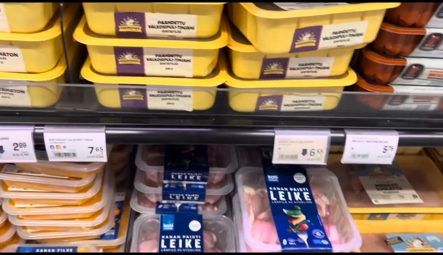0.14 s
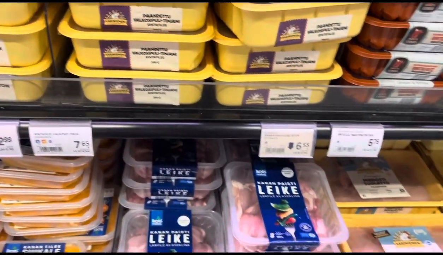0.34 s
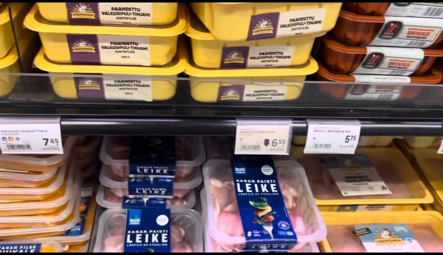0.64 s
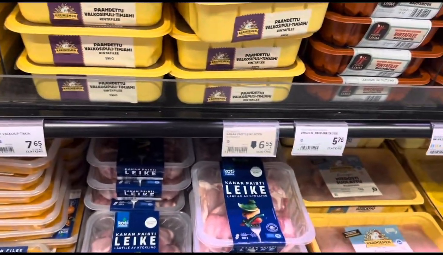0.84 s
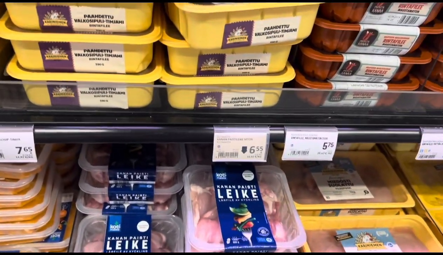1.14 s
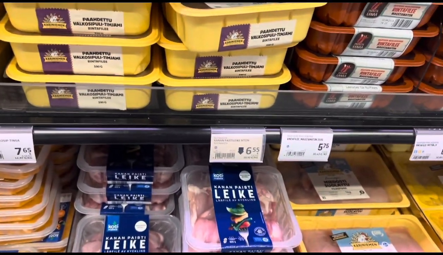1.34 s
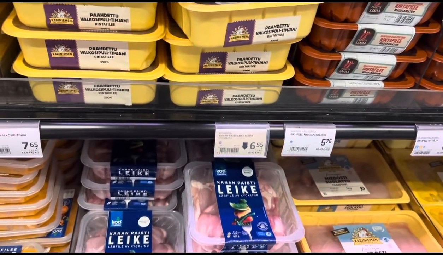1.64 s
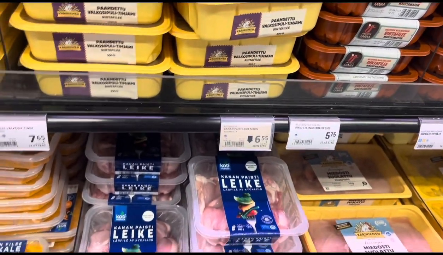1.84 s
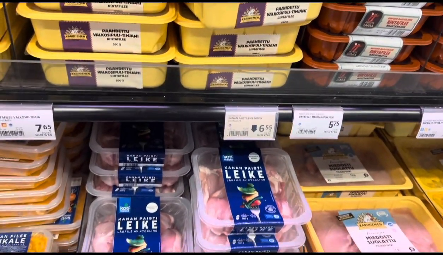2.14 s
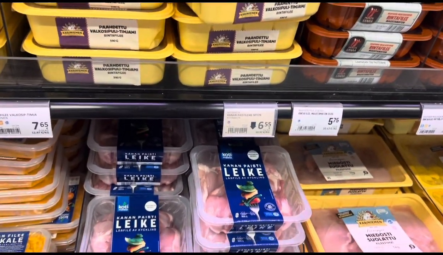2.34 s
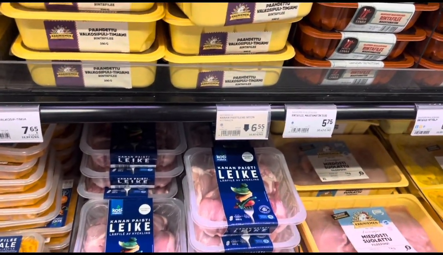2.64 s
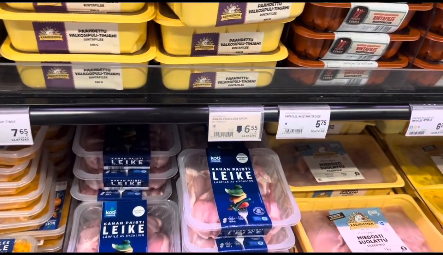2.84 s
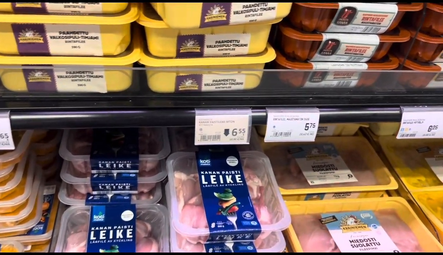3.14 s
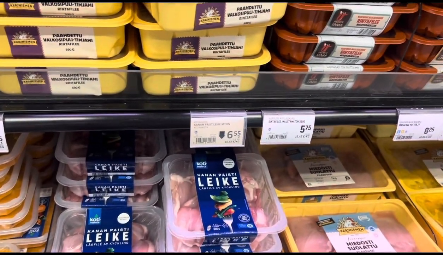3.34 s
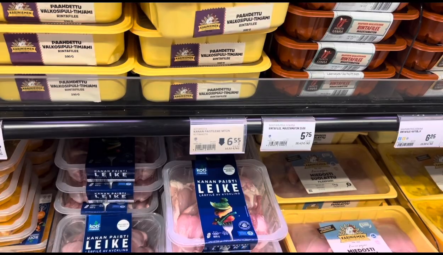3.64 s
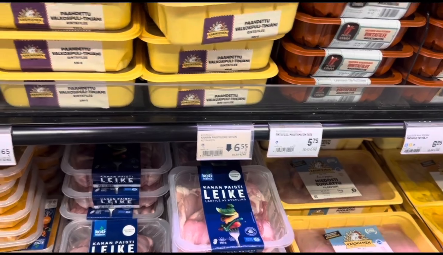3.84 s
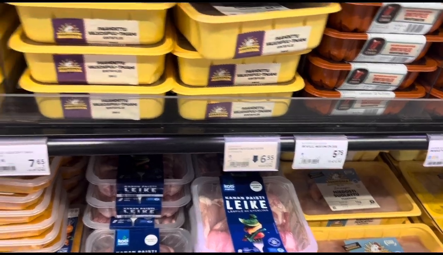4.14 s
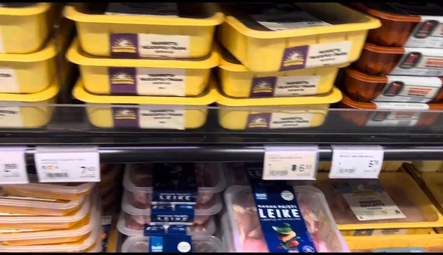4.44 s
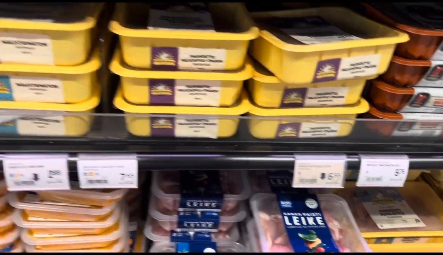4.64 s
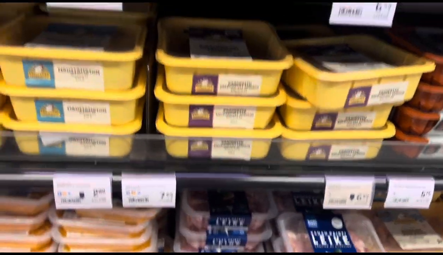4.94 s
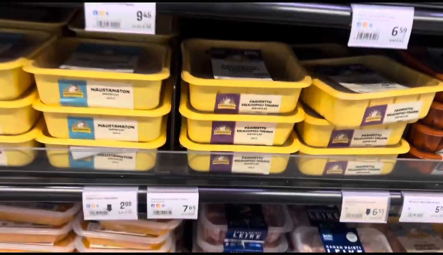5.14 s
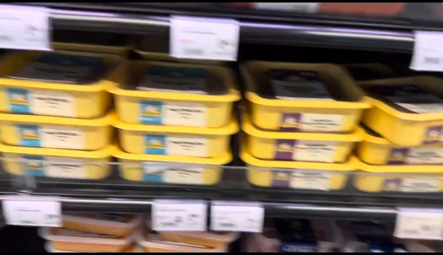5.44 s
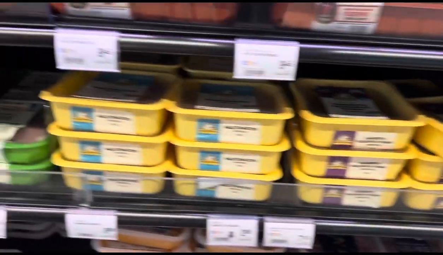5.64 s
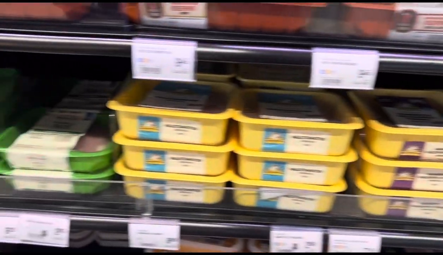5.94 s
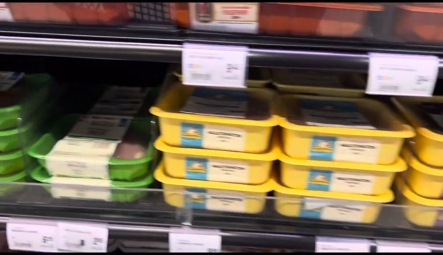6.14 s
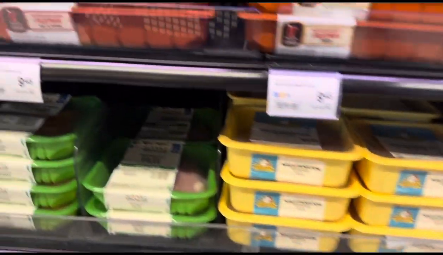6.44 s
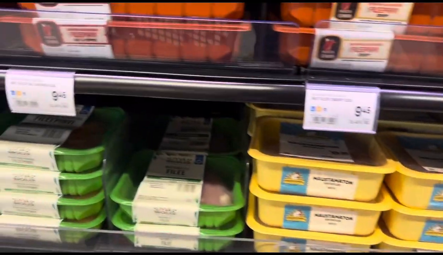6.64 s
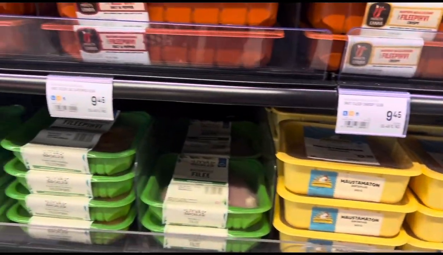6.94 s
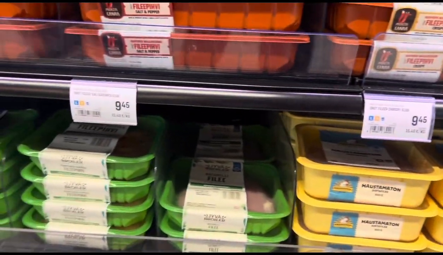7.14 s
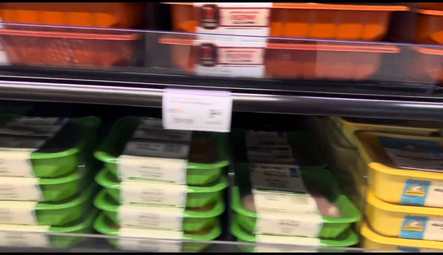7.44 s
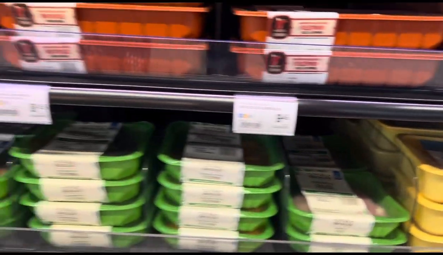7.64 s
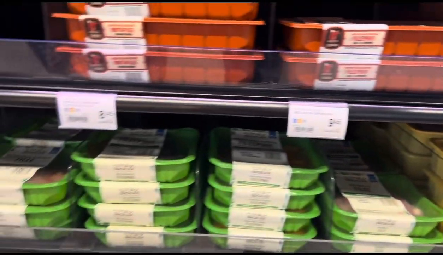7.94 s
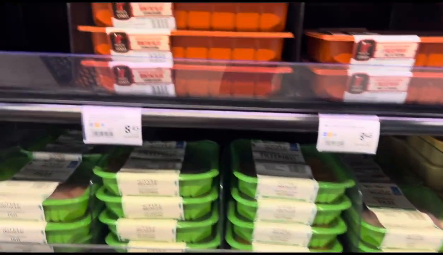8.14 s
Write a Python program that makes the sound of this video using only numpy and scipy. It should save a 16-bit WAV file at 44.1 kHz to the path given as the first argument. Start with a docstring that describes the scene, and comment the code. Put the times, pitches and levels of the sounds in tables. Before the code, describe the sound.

Steady low fan hum and rushing air from a store cooler, with soft clothing swishes and brief clatters of plastic trays.

```python
"""A quiet supermarket aisle, close to an open refrigerated case. From the start, fans at slightly
different speeds beat against each other over the air curtain's rush and a thin whistle. Someone shifts
along the shelf, and friction makes a jacket rustle. Just before 1 s, plastic packs clack a little way off
as impacts excite their modes. Sleeve swishes follow, then softer rubbing with faint ticks and squeaks.
From 6 s to 7.5 s the packs clatter again, and the jacket gives a last few swishes."""
import sys
import numpy as np
from scipy import signal
from scipy.fft import rfft, irfft, next_fast_len
from scipy.io import wavfile

SR = 44100
rng = np.random.default_rng(int(sys.argv[2]) if len(sys.argv) > 2 else 0)


def store_pcm(level_fs):
    """Save levels as 16-bit WAV."""
    pcm = np.round(np.clip(level_fs, -1, 1) * 32767).astype(np.int16)
    wavfile.write(sys.argv[1], SR, np.atleast_2d(pcm).T)


N = 366294
TIME = np.arange(N) / SR
FFT_SIZE = next_fast_len(N + 4000, True)
BINS_HZ = np.maximum(np.fft.rfftfreq(FFT_SIZE, 1 / SR), 1)


def from_db(db):
    """Amplitude ratio of a level in decibels."""
    return np.exp(np.asarray(db) * (np.log(10) / 20))


def unit_rms(x):
    """Normalisation to unit power."""
    return x / np.sqrt(np.mean(x ** 2) + 1e-20)


def over_time(rows):
    """Linear interpolation of each column of a curve at every sample."""
    times, *columns = np.transpose(rows)
    return [np.interp(TIME, times, column) for column in columns]


def over_hz(points):
    """Linear interpolation on a log-frequency axis."""
    hz, value = np.transpose(points)
    return np.interp(np.log(BINS_HZ), np.log(hz), value)


def filtered(x, response):
    """Linear filtering: the spectrum is multiplied by a frequency response."""
    return irfft(rfft(x, FFT_SIZE) * response, FFT_SIZE)[..., :N]


def noise(density):
    """Two independent Gaussian noises with the given amplitude spectral density."""
    return filtered(rng.standard_normal((2, N)), density) * np.sqrt(SR / 2)


def band_noise(envelope, hz, width_hz):
    """Narrow-band noise: a resonator's response to random forcing, under an envelope."""
    out, sounding = np.zeros((2, N)), np.flatnonzero(envelope)
    b, a = signal.iirpeak(hz, hz / width_hz, fs=SR)
    band = signal.lfilter(b, a, rng.standard_normal((2, len(sounding))))
    out[:, sounding] = envelope[sounding] * unit_rms(band)
    return out


def drift(corner_hz):
    """Slow random fluctuation: low-pass noise of unit power."""
    hop, settling = 100, 2000
    pole = np.exp(-2 * np.pi * corner_hz * hop / SR)
    white = rng.standard_normal(N // hop + settling + 2)
    slow = signal.lfilter([1], [1, -2 * pole, pole * pole], white)[settling:]
    return np.interp(np.arange(N) / hop, np.arange(len(slow)), unit_rms(slow))


def swell(at, rise, t60, hold=0):
    """Transient envelope: a quadratic rise to 1 at the given time, a hold, then exponential decay."""
    out = np.zeros(N)
    span = slice(max(int((at - rise) * SR), 0), int((at + hold + t60) * SR))
    t = TIME[span] - at
    out[span] = np.clip(1 + t / rise, 0, 1) ** 2 * from_db(-60 * np.maximum(t - hold, 0) / t60)
    return out


def wandering_phase(hz, wander_hz):
    """Phase as the time integral of a wandering frequency."""
    return 2 * np.pi * (np.cumsum(hz + wander_hz * drift(1.51)) / SR + rng.random())


def tone(phase, fade_db):
    """Multipath fading: a tone wavers as its reflections shift; in-phase and quadrature parts."""
    angle = (phase % (2 * np.pi)).astype(np.float32)
    gain = np.sqrt(2) * from_db(fade_db * drift(6.0))
    return gain * np.array([np.sin(angle), np.cos(angle)])


def shelf_echoes(depth, count=14):
    """Comb filtering: reflections between shelves and packs interfere and ripple the spectrum."""
    delays = rng.uniform(0.001008, .016, (count, 1))
    hz = np.arange(0, SR / 2, 4)
    echoes = np.exp(-2j * np.pi * delays * hz).sum(0) * depth / np.sqrt(count)
    ripple = abs(1 + echoes * np.minimum(hz / 1000, 1))   # shallower below 1 kHz
    return np.interp(BINS_HZ, hz, ripple) / np.sqrt(1 + depth ** 2)


# spectra of the ventilation and the air curtain: (frequency [Hz], relative density [dB])
DUCT_SPECTRUM = [(20, -73), (33, -77), (46, -60.5), (65, -55), (92, -50), (128, -52.5), (190, -54),
                 (235, -57), (280, -59.5), (325, -54), (400, -62.5), (520, -74), (800, -108.5)]
CURTAIN_SPECTRUM = [(250, -92), (400, -69.5), (510, -66.5), (620, -68), (700, -71), (770, -69.5),
                    (880, -69.5), (1000, -72.5), (1090, -76.5), (1280, -78.5), (1430, -78.5), (1620, -84.5),
                    (1750, -85.5), (1860, -82), (1990, -84.5), (2450, -85.5), (3400, -90.5), (3880, -89.5),
                    (4040, -85), (4200, -90.5), (5000, -93), (8500, -105), (11000, -117), (16000, -123)]


def airflow(rumble_db=-3.0, rush_db=-1.3):
    """Broadband flow noise: steady duct rumble and the smooth rush of the air curtain."""
    rush = noise(from_db(over_hz(CURTAIN_SPECTRUM)) * shelf_echoes(depth=0.17))
    rumble = noise(from_db(over_hz(DUCT_SPECTRUM)))
    return from_db(rumble_db) * rumble + from_db(rush_db) * rush


# the whistle, louder at some places along the shelf: (time [s], relative level [dB])
WHISTLE_LEVELS = [(0, -66), (.9, -68), (1.2, -77), (1.7, -76), (2.0, -70), (2.6, -74), (3.1, -66),
                  (3.65, -66.5), (3.95, -76), (4.4, -72), (4.75, -66), (5.35, -76), (5.8, -69), (6.4, -75),
                  (7.0, -65), (7.6, -72), (8.0, -72)]


def whistle(hz=4033, mains_ripple_hz=100, ripple_depth=.6, line_db=-2.5, blur_db=-6.5):
    """Amplitude modulation: a thin tone in a narrow band of noise ripples with the mains."""
    level_db, = over_time(WHISTLE_LEVELS)
    line = from_db(line_db) * tone(wandering_phase(hz, wander_hz=4.0), fade_db=3.0)
    blur = band_noise(from_db(blur_db) * np.ones(N), hz, width_hz=45)
    ripple = 1 + ripple_depth * np.sin(2 * np.pi * mains_ripple_hz * TIME)
    return from_db(level_db) * (line + blur) * ripple


# hum along the shelf, shared by the fans: (time [s], fundamental level [dB], third harmonic level [dB])
HUM_LEVELS = [(0.0, -33, -44), (0.75, -33.5, -37.5), (1.2, -36, -45), (1.5, -33, -40), (1.95, -43, -40),
              (2.25, -35.5, -38), (2.55, -45, -37.5), (2.8, -38, -38), (3.0, -49, -36.5),
              (3.15, -36, -38.5), (3.4, -34.5, -42.5), (3.6, -33.5, -36.5), (3.95, -38, -45.5),
              (4.2, -32.5, -41), (4.5, -34.5, -39), (5.4, -47, -42.5), (5.55, -37, -42), (5.85, -40.5, -52),
              (6.45, -35.5, -44), (6.75, -32, -46), (7.05, -37.5, -48), (7.7, -39.5, -46),
              (8.31, -34.5, -47)]
# its other harmonics: (multiple of the blade rate, level [dB])
FAN_HARMONICS = [(2, -43.3), (4, -50.3), (5, -53.3)]
# the fans: (blade rate [Hz], share of the hum [dB], extra gain of the overtones [dB])
FAN_ROTORS = [(108.33, -1.7, 0.5), (109.17, -12, 0.5), (112.4, -8, -6.5)]
# other motors: (frequency [Hz], level [dB], wander [Hz])
MOTOR_TONES = [(33, -64, 0.5), (48.85, -49, 0.574), (68.2, -55, 0.28), (90.3, -49, 0.49),
               (100.3, -50.5, 0.064), (147.6, -48, 0.41), (244.7, -53.5, 0.4), (264.6, -60, 0.496),
               (465, -56.5, 0.34)]


def fans_and_motors(fade_db=0.44):
    """Beating: blade-passing tones of three fans at unequal speeds throb among other motors' tones."""
    fundamental_db, third_db = over_time(HUM_LEVELS)
    hum = 0
    for hz, share_db, overtone_db in FAN_ROTORS:
        phase = wandering_phase(hz, wander_hz=0.22)
        hum += from_db(fundamental_db + share_db) * tone(phase, fade_db)
        for multiple, db in [(3, third_db)] + FAN_HARMONICS:
            hum += from_db(db + share_db + overtone_db) * tone(multiple * phase, fade_db * multiple)
    for hz, db, wander_hz in MOTOR_TONES:
        hum += from_db(db) * tone(wandering_phase(hz, wander_hz), fade_db=2.5)
    return hum


# ticks of zip and creases: (time [s], level [dB], centre frequency [Hz], bandwidth [Hz])
CREASE_TICKS = [(0.9542, -46, 13000, 7000), (2.211, -57, 8000, 4000), (2.401, -57, 13000, 5000),
                (3.4276, -54, 7000, 3000), (3.6237, -57, 6500, 3000), (3.7299, -51, 6000, 5000),
                (4.347, -51, 8000, 6000), (4.3664, -47, 5500, 4000), (4.4194, -52, 7000, 6000),
                (4.652, -54.5, 10400, 5000), (4.726, -55, 7000, 2000), (4.7581, -49, 6800, 3000),
                (4.9566, -50, 8500, 6000), (5.214, -47, 5600, 900), (5.4685, -50, 6800, 4000),
                (5.868, -50, 5000, 3500), (6.716, -49, 7500, 4000), (6.919, -50, 6500, 4000),
                (7.619, -50, 5000, 4000)]


def ticks():
    """Impulsive excitation: zip and creases give off bright, quickly damped bursts of noise."""
    return sum(band_noise(from_db(db) * swell(at, rise=.001, t60=0.049), hz, width_hz)
               for at, db, hz, width_hz in CREASE_TICKS)


# squeaks of film wrap: (time [s], duration [s], relative level [dB], pitch [Hz])
FILM_SQUEAKS = [(1.49, .02, -59, 5600), (2.965, .05, -65, 6100), (3.82, .06, -67.5, 7900),
                (5.868, .035, -58.5, 2500), (5.91, .03, -68, 7000), (7.4, .04, -59, 5100),
                (7.53, .04, -64, 5700)]


def squeaks(gain_db=6.0):
    """Stick-slip friction: film slides on film at a nearly even rate, giving a narrow band of noise."""
    return sum(band_noise(from_db(db + gain_db) * swell(at, rise=0.012, t60=.15, hold=hold), hz, 110)
               for at, hold, db, hz in FILM_SQUEAKS)


# friction spectrum of the cloth: (frequency [Hz], relative density [dB])
CLOTH_SPECTRUM = [(300, -24), (900, 3.5), (1350, 3), (1700, -0.5), (2300, 1.5), (3000, -1), (4200, 0.5),
                  (6600, -1), (8200, -2.5), (10000, -3.5), (12500, -8), (15000, -2), (17000, -7.5)]
# sleeve strokes: (time of full speed [s], relative level [dB], rise [s], decay T60 [s],
# gain of the low band [dB], pitch of the weave [Hz], gain of its rasp [dB])
SLEEVE_SWISHES = [(.545, -51, 0.069, 0.94, -1, 8300, -8), (1.378, -46.5, 0.012, 0.54, -6, 6700, -8),
                  (1.456, -41.5, 0.0055, 0.16, -19, 6600, -8), (1.475, -48, 0.0092, 0.13, -10, 6840, -8),
                  (1.87, -52, 0.077, 0.36, -10, 8600, -8), (1.91, -44.5, 0.046, 0.39, -8, 8200, -7),
                  (2.298, -38, .003, 0.155, -9, 7000, -7), (2.306, -40.5, .009, 0.135, -5, 4100, -10),
                  (2.686, -41.5, 0.0032, 0.26, 2.5, 6360, -8), (2.839, -50, 0.0074, 0.28, -8, 7150, -10),
                  (4.0, -57.5, 0.043, .5, -10, 7400, -4), (4.15, -54, 0.3, 1, -14, 7400, -9),
                  (4.27, -51.5, .025, 0.14, -1, 2300, -8), (5.885, -58, .025, .3, 12, 5500, -8),
                  (6.003, -56.5, 0.025, 1, 12, 4600, -9), (7.336, -49, 0.0063, 0.64, 7.5, 5400, -12),
                  (7.402, -49.5, 0.02, 0.74, 8, 5300, -8), (7.477, -42.5, 0.0077, 0.2, -10, 6750, -4.5),
                  (7.916, -49, 0.0057, 0.36, 2, 7400, -8)]


def swishes(gain_db=6.5, crossover_hz=2000, cross_thread_ratio=0.86):
    """Sliding friction: noise, fuller when the cloth presses, with a rasp from the periodic weave."""
    friction = unit_rms(noise(from_db(over_hz(CLOTH_SPECTRUM)) * shelf_echoes(depth=1.0)))
    low_band = filtered(friction, 1 / (1 + (BINS_HZ / crossover_hz) ** 4))
    high_power, low_power, weave = 0, 0, 0
    for at, db, rise, t60, low_db, weave_hz, rasp_db in SLEEVE_SWISHES:
        envelope = from_db(db + gain_db) * swell(at, rise, t60)
        high_power += envelope ** 2
        low_power += (envelope * from_db(low_db)) ** 2
        for hz in (weave_hz, weave_hz * cross_thread_ratio):
            weave += band_noise(envelope * from_db(rasp_db), hz, width_hz=590)
    return np.sqrt(high_power) * (friction - low_band) + np.sqrt(low_power) * low_band + weave


# shifts of the body: (time [s], duration [s], level [dB])
BODY_SHIFTS = [(.12, .04, -62), (0.41, .65, -57), (1.32, 0.23, -55), (1.83, 0.2, -58), (2.282, 0.13, -58),
               (2.582, 0.053, -52.5), (2.743, .17, -50), (3.015, 0.37, -58), (3.423, 0.3, -51.5),
               (3.915, 0.5, -53), (4.748, 0.17, -59), (4.974, 0.21, -55.5), (5.494, 0.69, -54),
               (6.45, 0.46, -49.5), (7.003, 0.41, -55.5), (8.1, .1, -54.5)]


def rubbing(attack_s=0.1, release_t60=0.68, rolloff_hz=12000):
    """Incoherent addition: overlapping slow rubs sum in power, their noise duller than a swish."""
    low_lift_db = over_hz([(1500, 1.5), (4000, 0)])
    spectrum = from_db(over_hz(CLOTH_SPECTRUM) + low_lift_db) / np.hypot(1, BINS_HZ / rolloff_hz)
    friction = unit_rms(noise(spectrum * shelf_echoes(depth=0.69)))
    power = 0
    for at, duration, db in BODY_SHIFTS:
        attack = np.clip(1 + (TIME - at) / attack_s, 0, 1)
        release_db = -60 * np.clip((TIME - at - duration) / release_t60, 0, 2)
        power += (attack * from_db(db + release_db)) ** 2
    flutter_db = 2.2 * drift(18) + 1.3 * drift(5)
    return friction * np.sqrt(power) * from_db(flutter_db)


def jacket(grain_db=0.77):
    """Stick-slip friction: fibres catch and slip, giving every movement a fine grain."""
    return (swishes() + rubbing()) * from_db(grain_db * drift(130))


# modes of the packs: (frequency [Hz], bandwidth [Hz], relative level [dB], side minus mid [dB])
PACK_MODES = [(780, 140, -4.5, -2), (1050, 210, 2, -2), (1283, 66, 5, 2.5), (1430, 137, 6.5, 5.5),
              (1877, 76, 6, 0.5), (2130, 440, -4.5, 0.5), (3140, 780, -8, 1), (3670, 260, -9.5, 2),
              (5200, 220, -22.5, -6), (5860, 120, -29, 2)]


def pack_response():
    """Modal superposition: damped resonances of thin plastic add with alternating sign."""
    modes = 0
    for k, (hz, width_hz, db, side_db) in enumerate(PACK_MODES):
        resonance = 1 / (1 + 1j * (BINS_HZ - hz * hz / BINS_HZ) / width_hz)
        modes += (-1) ** k * resonance * from_db([[db - side_db / 2], [db + side_db / 2]])
    # oblique incidence puts the side signal a quarter cycle from the mid
    return modes * [[1], [1j]] / np.sqrt(np.mean(abs(modes) ** 2))


# bright snap of a contact: (frequency [Hz], relative density [dB])
SNAP_SPECTRUM = [(700, -25), (1500, -15), (3000, -18), (3600, 3), (4900, 6), (6000, 3), (6700, -2),
                 (7450, -13), (8300, -7), (12000, -26), (16000, -20)]
# packs knocking on a shelf: (time [s], relative level [dB], brightness [dB], contact T60 [s],
# panel note [Hz], panel level [dB], rim note [Hz], rim level [dB])
PACK_KNOCKS = [(0.781, -22, -5, 0.05, 1500, -25.5, 2830, -27.5),
               (0.8102, -27.5, -14, 0.07, 1700, -29, 3300, -37),
               (0.8325, -33, -24, .05, 1400, -33, 2300, -43), (0.8420, -33, -24, .05, 1750, -35, 2300, -43),
               (0.8565, -27, -21, 0.1, 1420, -28.5, 1950, -30),
               (0.915, -33, -18, 0.06, 1500, -40, 3900, -50),
               (0.9235, -37.5, -20, .04, 2500, -39, 3900, -50),
               (0.9445, -39, -22, .04, 1450, -41, 2500, -50),
               (6.0177, -31, -18, 0.045, 1400, -28.5, 1900, -41),
               (6.0795, -38, -20, .05, 2100, -41, 1400, -45), (6.429, -34, -18, 0.04, 1400, -39, 2400, -46),
               (6.4648, -24, -9, 0.075, 1750, -30, 4850, -33),
               (6.4695, -28.5, -11, .04, 920, -30, 4450, -37),
               (6.4815, -35, -12, .05, 1400, -39, 5300, -43), (6.675, -27, -12, 0.06, 2050, -32, 4950, -39),
               (6.7511, -33, -26, 0.11, 1400, -40, 2500, -50),
               (6.7744, -26, -23, 0.06, 1500, -29, 3100, -38),
               (6.786, -25.5, -22, 0.09, 2400, -31, 3200, -40),
               (6.8145, -26.5, -21, 0.08, 1550, -31, 2500, -39),
               (6.8245, -31.5, -24, .05, 1450, -33, 2500, -45),
               (6.8578, -29, -24, .045, 1500, -34, 3100, -42), (6.873, -35, -24, .04, 1400, -39, 2500, -48),
               (6.9768, -27.5, -11, 0.04, 1520, -33, 7000, -43),
               (7.0458, -30, -23, .045, 1450, -31, 2100, -41), (7.066, -36, -20, .09, 1500, -41, 2100, -47),
               (7.251, -41, -20, .04, 1400, -46, 2500, -55), (7.506, -32.5, -2, 0.07, 2400, -36, 3000, -40)]


def pack_clacks(blow_db=11.0, crackle_db=-6.5, snap_db=-7.0, aisle_db=-10.0, aisle_t60=0.35):
    """Impact excitation: a blow and a crackle drive the modes under a snap; the aisle adds a dull tail."""
    blows, crackle_power, snap_power = np.zeros(N), 0, 0
    for at, db, bright_db, t60, *_ in PACK_KNOCKS:
        blows[round(at * SR)] = from_db(db + blow_db)
        contact = swell(at + 0.0005, rise=0.0022, t60=t60)
        tail = from_db(aisle_db) * swell(at + 0.016, rise=.01, t60=aisle_t60)
        crackle_power += from_db(db + crackle_db) ** 2 * (contact ** 2 + tail ** 2)
        snap_power += (from_db(db + bright_db + snap_db) * contact) ** 2
    force = blows + np.sqrt(crackle_power) * rng.standard_normal((2, N))
    snap = np.sqrt(snap_power) * unit_rms(noise(from_db(over_hz(SNAP_SPECTRUM))))
    return filtered(force, pack_response()) + snap


def pack_notes(t60=.02):
    """Free vibration: each knock lands on another spot, whose panel and rim ring at their own notes."""
    out = np.zeros((2, N))
    for at, *_, panel_hz, panel_db, rim_hz, rim_db in PACK_KNOCKS:
        envelope = swell(at + .0005, rise=.001, t60=t60)
        ringing = np.flatnonzero(envelope)
        for hz, db in ((panel_hz, panel_db), (rim_hz, rim_db)):
            cycles = hz * (TIME[ringing] - at) + rng.random((2, 1))   # unrelated mid and side phases
            out[:, ringing] += from_db(db) * envelope[ringing] * np.sin(2 * np.pi * cycles)
    return out


# likeness of left and right, before the sign flips below: (frequency [Hz], correlation [-1 to 1])
CORRELATION = [(30, 1), (130, 0.94), (320, 0.87), (500, 0.42), (750, 0.24), (1000, -0.14), (1550, -0.057),
               (1900, 0.15), (2500, 0.35), (4200, 0.47), (6000, 0.19), (7600, 1)]
# treble bands where left and right are in antiphase: (lower edge [Hz], upper edge [Hz])
ANTIPHASE_BANDS = [(8800, 10450), (12750, 14150)]
# balance of the pair: (frequency [Hz], left minus right [dB])
BALANCE = [(100, -0.5), (350, -0.2), (620, 1.5), (1200, 2.4), (1600, -1), (1780, -2), (2000, -0.2),
           (4500, 3.5), (6500, 2), (7500, 0)]


def microphones(field, edge_hz=130):
    """Mid-side stereo: the correlation at each frequency weights the pair's sum and difference."""
    correlation = np.clip(over_hz(CORRELATION), -1, 1)
    for low, high in ANTIPHASE_BANDS:
        correlation *= 1 - np.tanh((BINS_HZ - low) / edge_hz) + np.tanh((BINS_HZ - high) / edge_hz)
    correlation = np.clip(correlation, -1, 1)
    mid, side = filtered(field, np.sqrt([(1 + correlation) / 2, (1 - correlation) / 2]))
    lean_db = over_hz(BALANCE) / 2
    return filtered(np.array([mid + side, mid - side]), from_db([lean_db, -lean_db]))


def scene():
    """Superposition: the case, the jacket and the packs add, each as a mid and a side signal."""
    background = fans_and_motors() + whistle() + airflow()
    return microphones(background + jacket() + ticks() + squeaks() + pack_clacks() + pack_notes())


def record(dry, cutoff_hz=15900):
    """Band limiting: a steep elliptic low-pass removes the highest treble."""
    return signal.sosfilt(signal.ellip(10, .1, 80, cutoff_hz, fs=SR, output="sos"), dry)


dry = scene()
out = record(dry)
store_pcm(out)
```